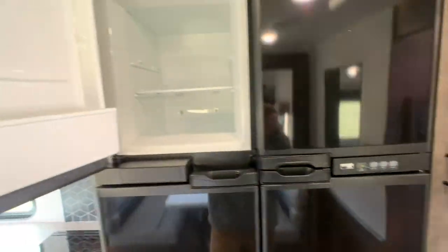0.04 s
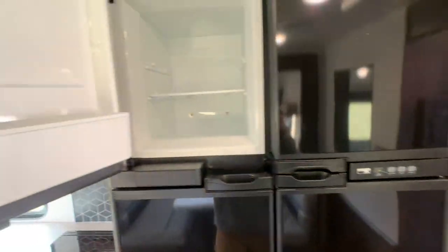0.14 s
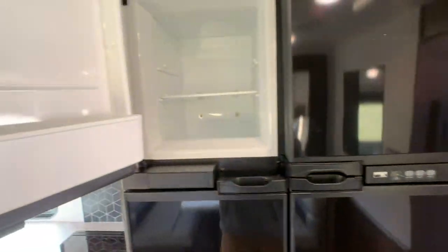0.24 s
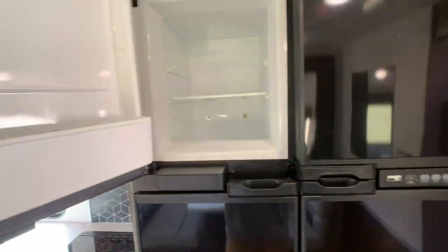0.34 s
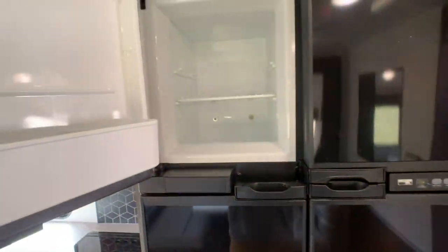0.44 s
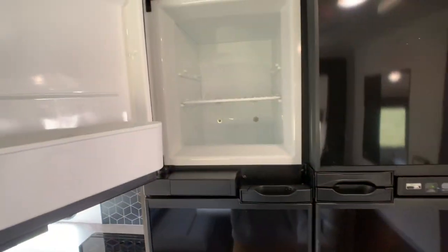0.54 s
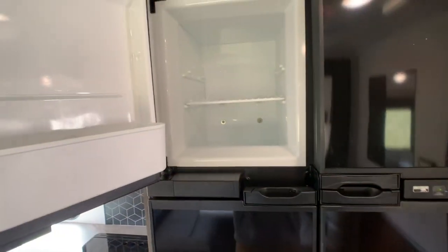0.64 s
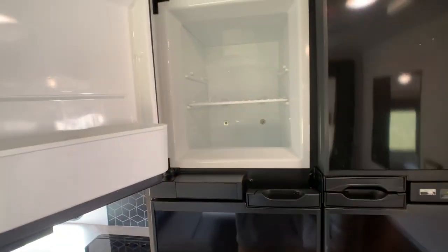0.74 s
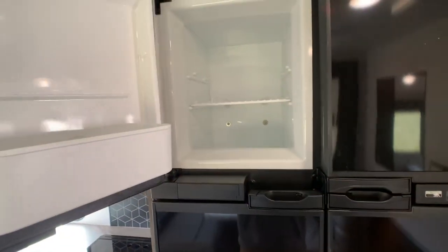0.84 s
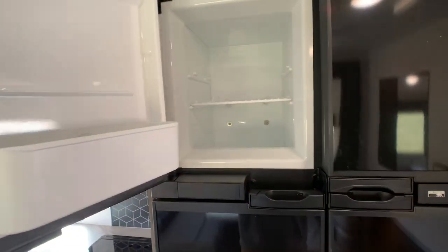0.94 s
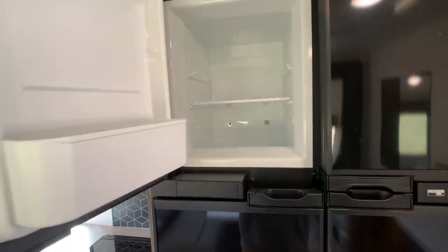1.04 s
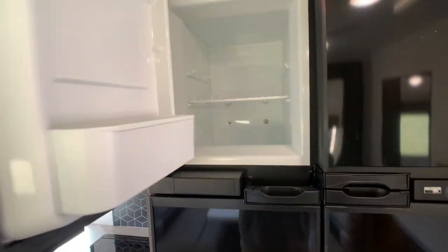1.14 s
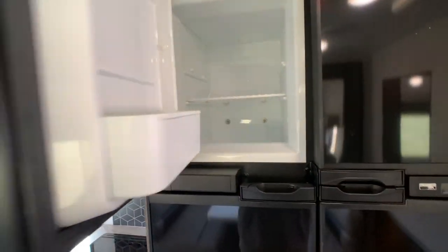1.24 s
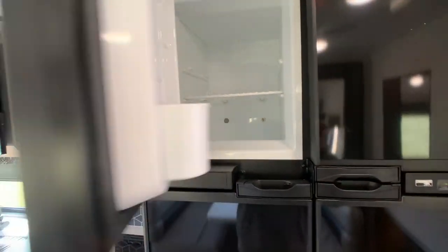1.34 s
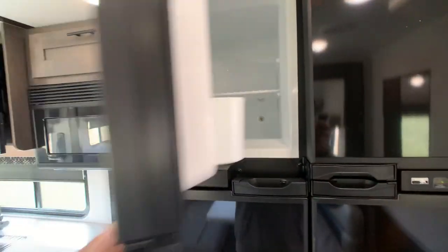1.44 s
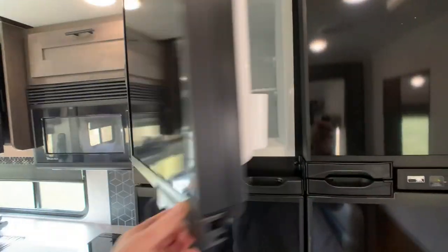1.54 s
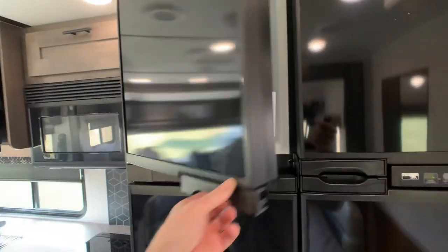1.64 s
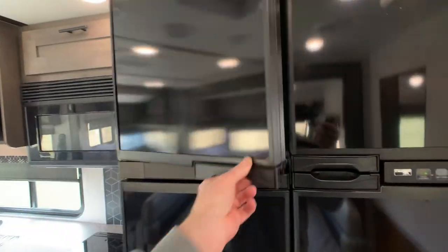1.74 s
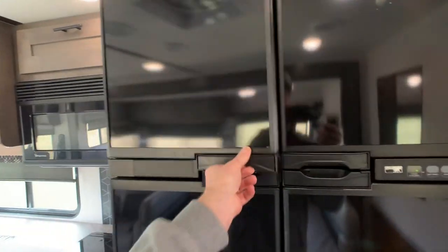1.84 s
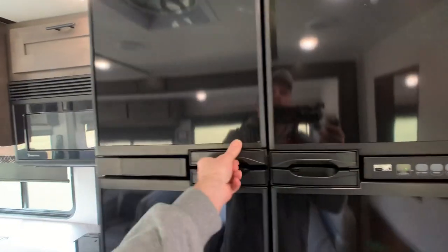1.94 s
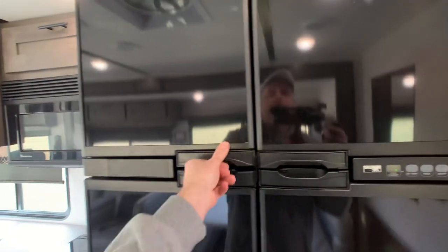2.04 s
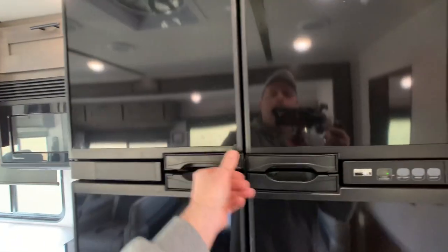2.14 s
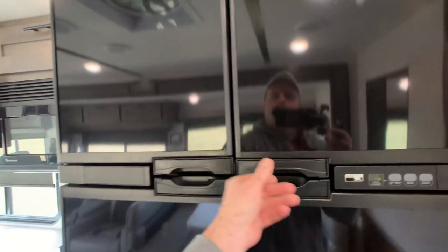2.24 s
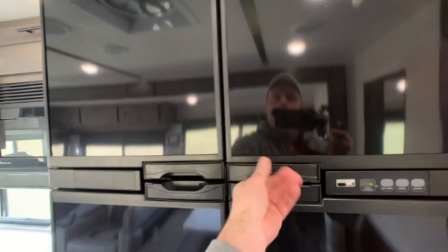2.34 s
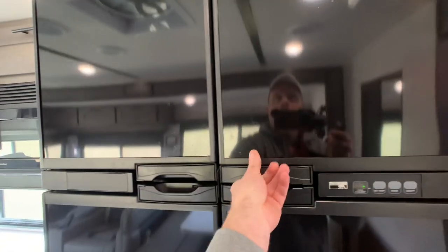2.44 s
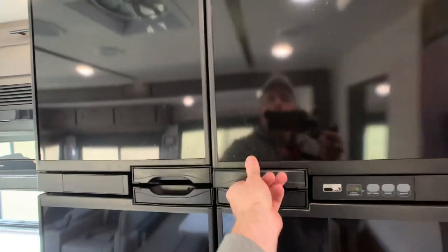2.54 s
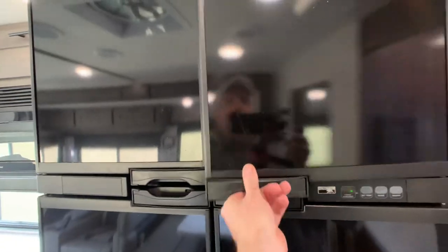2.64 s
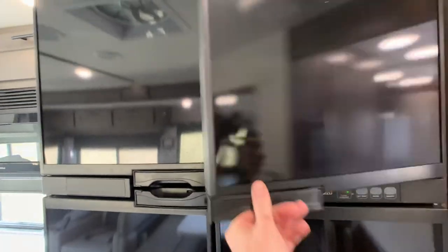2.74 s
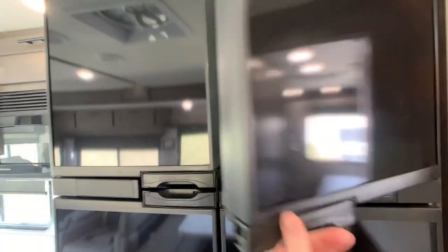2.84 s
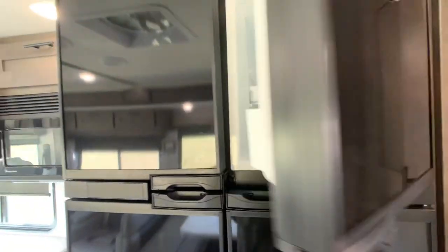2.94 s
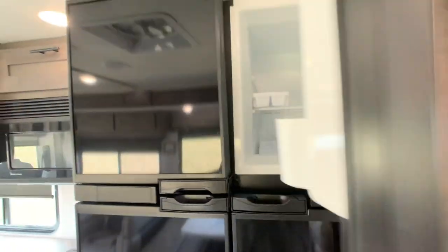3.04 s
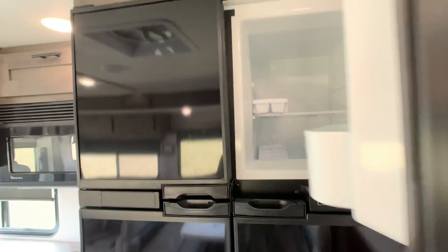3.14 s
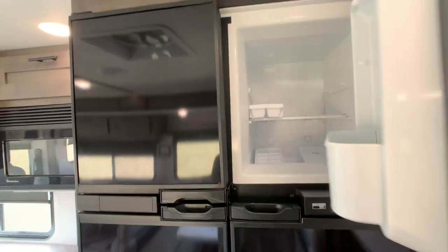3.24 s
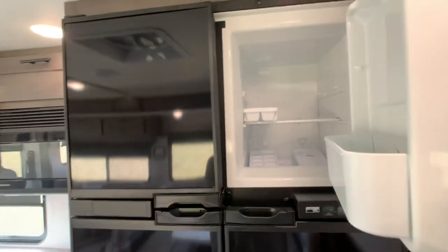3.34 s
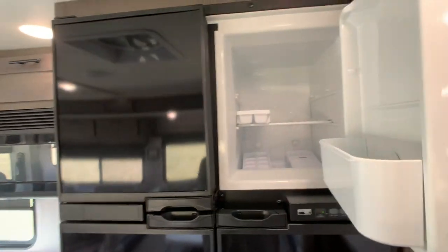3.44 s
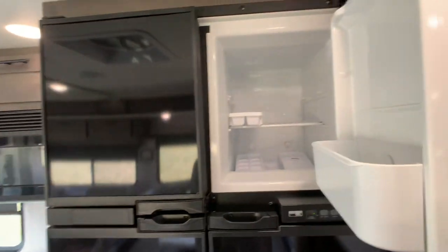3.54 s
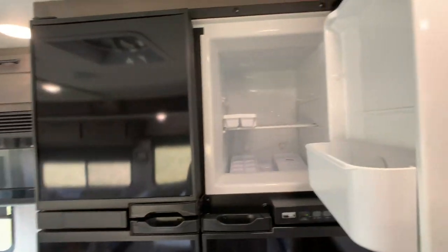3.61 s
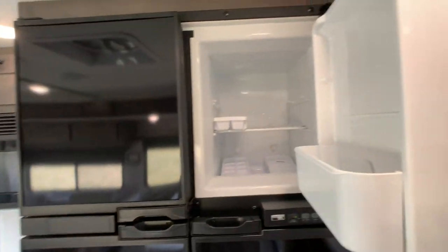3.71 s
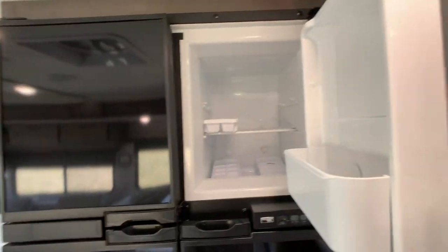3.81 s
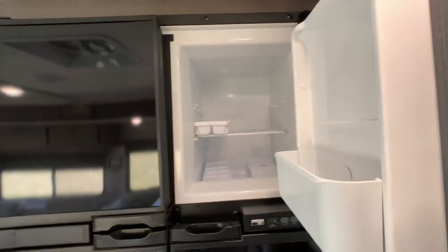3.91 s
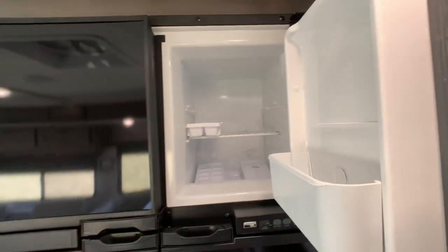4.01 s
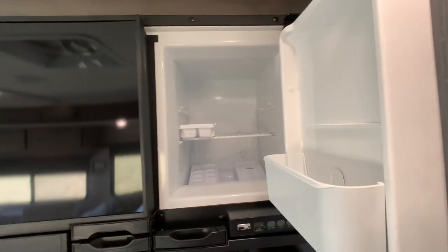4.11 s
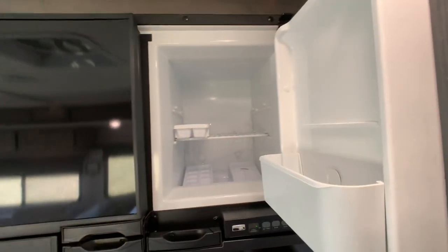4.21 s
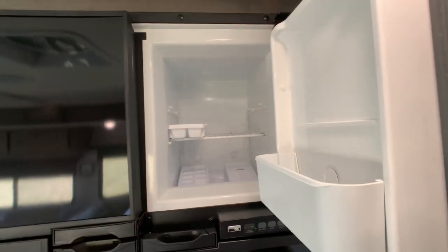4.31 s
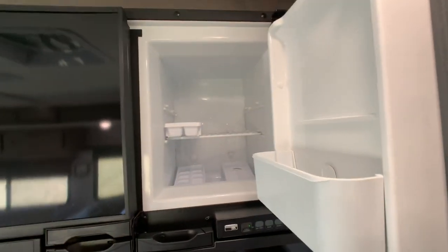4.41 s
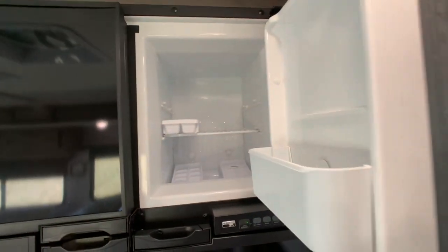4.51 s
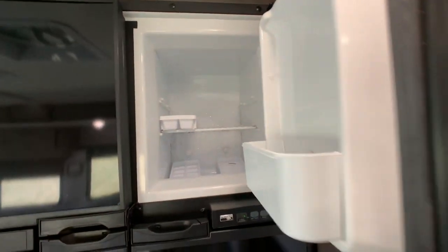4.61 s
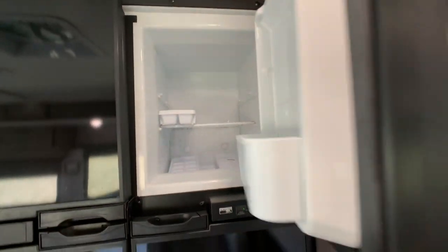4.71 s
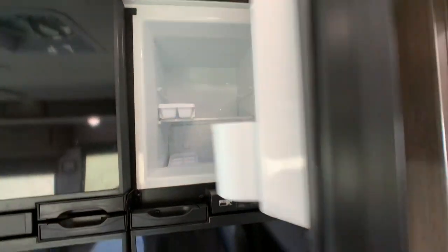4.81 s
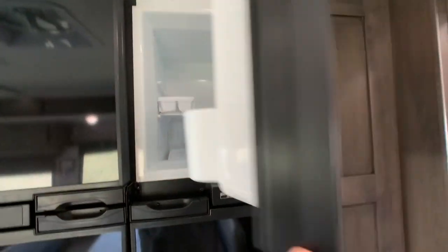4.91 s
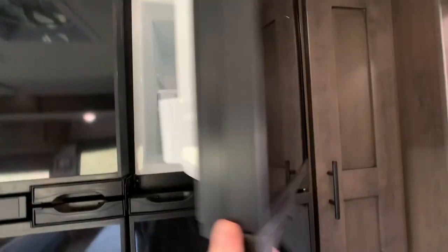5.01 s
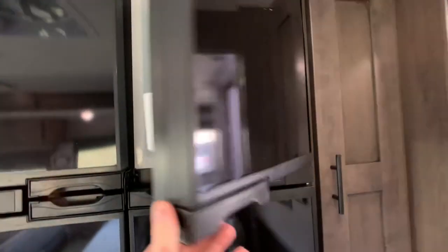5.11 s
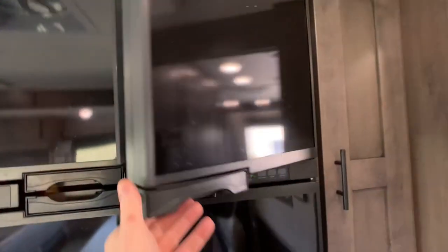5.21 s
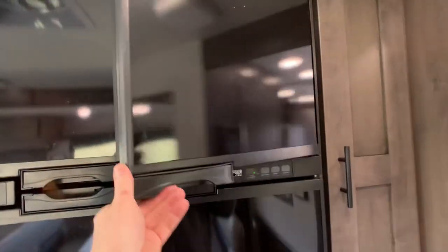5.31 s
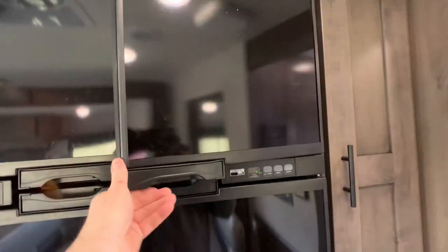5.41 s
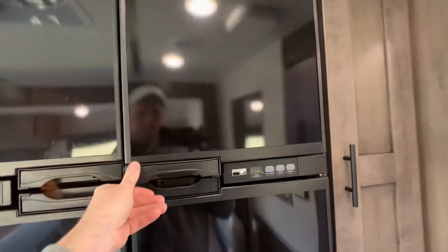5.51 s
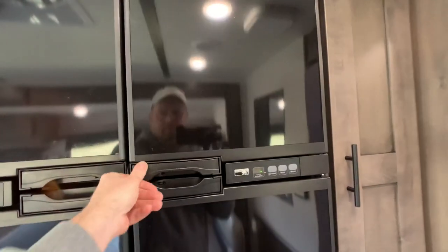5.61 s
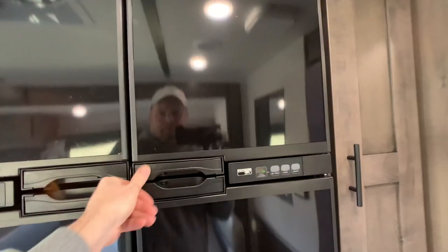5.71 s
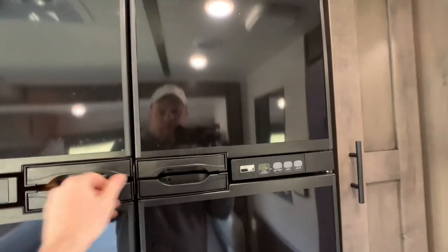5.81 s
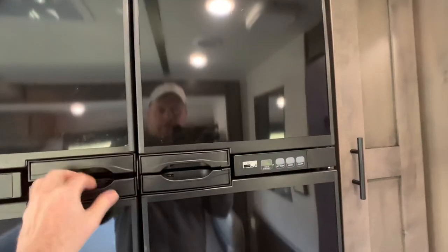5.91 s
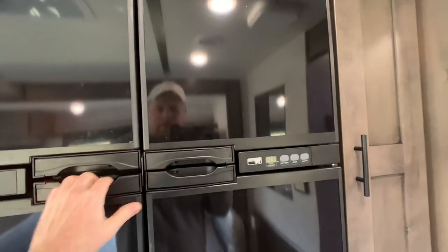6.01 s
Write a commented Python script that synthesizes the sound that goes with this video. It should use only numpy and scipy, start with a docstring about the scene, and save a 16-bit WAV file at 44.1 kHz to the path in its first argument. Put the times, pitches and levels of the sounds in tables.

```python
"""Two plastic-lined freezer doors knock shut in a small cabin, heard from close by.
The left one swings shut; the right one is unlatched, peels off its gasket, opens and is shut again.
Each hit is a short rattle that makes a part ring. Latches scrape over their catches and snap in,
liners and shelves tick, and a hand bumps and rubs. A faint hum and slow air rumble lie underneath."""
import sys
import numpy as np
from scipy import signal
from scipy.fft import rfft, irfft, next_fast_len
from scipy.io import wavfile
from scipy.ndimage import uniform_filter1d

SR = 44100
rng = np.random.default_rng(int(sys.argv[2]) if len(sys.argv) > 2 else 0)


def persist_wave(psi):
    """Save psi, clipped to +-1, as 16-bit WAV."""
    counts = np.round(np.clip(psi, -1, 1) * 32767).astype(np.int16)
    wavfile.write(sys.argv[1], SR, np.atleast_2d(counts).T)


N = 267246
TIME = np.arange(N) / SR
AGE = np.arange(SR // 2) / SR  # seconds since a hit


def amp(db):
    """Turn decibels into a gain."""
    return 10 ** (np.asarray(db) / 20)


def unit(x):
    """Scale a sound to an average (rms) level of 1."""
    return x / np.sqrt(np.mean(x ** 2) + 1e-20)


def fade(t, fade_s):
    """Die away by 60 dB in fade_s seconds: every fade time here means this."""
    return np.exp(-np.log(1000) * t / np.maximum(fade_s, 1e-3))


def swell(peak_s, build_s, fade_s):
    """A gain that grows by 60 dB in build_s, reaches 1 at peak_s and fades again."""
    return fade(np.maximum(peak_s - TIME, 0), build_s) * fade(np.maximum(TIME - peak_s, 0), fade_s)


def along(points, hz):
    """Read between (pitch, value) points, with octaves evenly spaced."""
    pitches, values = np.transpose(points)
    return np.interp(np.log(hz + 1e-3), np.log(pitches), values)


def tilt(hz, db_per_octave):
    """Harder contact is brighter: a slope across the middle and treble."""
    return amp(db_per_octave * np.log2(np.clip(hz, 550, 8500) / 2300))


def filtered(x, response):
    """Turn each pitch in x up or down by response(hz)."""
    size = next_fast_len(len(x) + SR // 4)
    return irfft(rfft(x, size) * response(np.fft.rfftfreq(size, 1 / SR)), size)[:len(x)]


def coloured(x, colour):
    """Shape x with (pitch, level) points, then scale it to level 1."""
    return unit(filtered(x, lambda hz: amp(along(colour, hz))))


def narrow(centre_hz, spread_hz):
    """Noise around one pitch, at level 1."""
    return unit(filtered(rng.standard_normal(N), lambda hz: 1 / (1 + ((hz - centre_hz) / spread_hz) ** 4)))


def causal(gain):
    """A filter with this gain that never sounds before it is struck (minimum phase)."""
    cepstrum = irfft(np.log(np.maximum(gain, 1e-6 * gain.max())))
    half = len(cepstrum) // 2
    return np.exp(rfft(np.r_[cepstrum[0], 2 * cepstrum[1:half], np.zeros(half)]))


def add(track, time_s, sound):
    """Mix a sound into the track at time_s."""
    start = max(round(time_s * SR), 0)
    track[start:start + len(sound)] += sound[:max(N - start, 0)]


# How long the cabin echoes (pitch [Hz], fade time [s])
ECHO_FADES = [(100, 0.24), (500, 0.27), (2000, 0.28), (6000, 0.4), (10000, 0.31), (15000, 0.18)]
def cabin_echo(build_s=0.0056):
    """Close walls send back a dense echo that builds in a few milliseconds; its energy is 1."""
    hz, t, noise = signal.stft(rng.standard_normal(len(AGE)), SR, nperseg=256)
    dying = noise * fade(t, along(ECHO_FADES, hz)[:, None])
    echo = signal.istft(dying, SR, nperseg=256)[1][:len(AGE)]
    echo *= 1 - np.exp(-AGE / build_s)
    return echo / np.linalg.norm(echo)


def in_cabin(x, echo_db):
    """A sound plus its echo."""
    return x + amp(echo_db) * signal.fftconvolve(x, cabin_echo())[:len(x)]


# Tone colours of the cabin's air and of its slow pressure swings (pitch [Hz], relative level [dB])
AIR_COLOUR = [(20, 5), (33, 6), (50, -12.5), (85, -2), (130, -18.5), (220, -17), (380, -19), (520, -20.5),
              (750, -29.5), (1200, -33.5), (3000, -42), (7000, -45.5), (10000, -48), (15500, -48.5)]
SWAY_COLOUR = [(1, -6), (4, -6), (7, 0.5), (12, -4.5), (15, -18), (19, -29), (40, -58), (100, -120)]
def background():
    """A wavering hum, soft cabin noise and very slow swings of air pressure."""
    hum = (amp(-67.5) * narrow(84.8, 18) + amp(-73.5) * narrow(378, 24)
           + amp(-72) * narrow(295, 37) + amp(-78.5) * narrow(505, 44))
    air = amp(-56.5) * coloured(rng.standard_normal(N), [(3.4, -24.5)] + AIR_COLOUR)
    sway = amp(-31.5) * coloured(rng.standard_normal(N), SWAY_COLOUR)
    return hum + air + sway


def stick_slip(slips_per_s, depth_db):
    """Surfaces stick and slip unevenly, so the level jumps about quickly."""
    jumps = rng.standard_normal(N // 20)
    return amp(depth_db * np.interp(TIME * slips_per_s, np.arange(len(jumps)), jumps))


# Rubbing strokes (peak time [s], level [dB], brightness [dB per octave], fade time [s])
STROKES = [(0.005, -41.5, -2.5, 0.08), (1.1, -70.5, 1, 0.25), (1.309, -58.5, -1.5, .38),
           (1.85, -69.5, -0.5, 1.3), (2.071, -58, -3, 0.47), (2.438, -63, 0, 0.45), (2.62, -48.5, -3, 0.55),
           (2.768, -47.5, -1, 0.34), (3.2, -70.5, 0.5, 1.44), (3.68, -71, 0.5, .45),
           (4.41, -72.5, 4.5, 0.27), (4.52, -71, 2, 0.35), (4.81, -70, 2.3, 0.31), (4.97, -76, 0, 0.49),
           (5.4, -63.5, 1.5, 0.56), (5.8, -50.5, -4, 0.19), (6.05, -49, -2.2, 0.81)]
# Tone colour of the rustle (pitch [Hz], relative level [dB])
RUSTLE_COLOUR = [(180, -28.5), (300, -7), (366, -3), (603, -4), (1610, -8.5), (2610, -10.5), (4520, -14),
                 (5340, -15.5), (5800, -17), (8790, -21.5), (16000, -39)]
def rubbing():
    """Skin, sleeve and gasket (the door's seal) rustle: each stroke swells and fades, catching as it goes."""
    track = np.zeros(N)
    for peak_s, db, brightness, fade_s in STROKES:
        noise = rng.standard_normal(N)
        rustle = filtered(noise, lambda hz: amp(along(RUSTLE_COLOUR, hz)) * tilt(hz, brightness))
        track += amp(db) * swell(peak_s, build_s=0.83 * fade_s, fade_s=fade_s) * unit(rustle)
    return in_cabin(track * unit(stick_slip(slips_per_s=290, depth_db=6.5)), echo_db=-4)


# Soft bumps of hand and door (time [s], level [dB], pitch [Hz])
SOFT_BUMPS = [(0.003, -38.5, 103.7), (0.014, -33, 269), (1.933, -36.5, 37), (2.517, -31, 482),
              (2.560, -47, 514), (2.615, -35.5, 85.4), (2.624, -39, 376), (2.627, -29.5, 864),
              (2.857, -46, 209), (6.050, -37, 202)]
def bumps():
    """A soft push rings one note of a panel, roughened by the give of the hand."""
    track = np.zeros(N)
    for time_s, db, hz in SOFT_BUMPS:
        give_colour = [(hz / 4, -22), (hz, 0), (hz * 2, -12), (hz * 8, -45)]
        give = coloured(rng.standard_normal(len(AGE)), give_colour)
        panel = np.sin(2 * np.pi * hz * AGE) + 0.91 * give
        fade_s = 0.16 * (100 / hz) ** 0.92  # higher notes die sooner
        rise = 1 - np.exp(-AGE * hz / 0.8)  # builds in about one cycle
        add(track, time_s, amp(db) * panel * fade(AGE, fade_s) * rise)
    return in_cabin(track, echo_db=-5.5)


# The four pitch ranges of a hit: thud, knock, clack and tick (lowest [Hz], highest [Hz])
HIT_RANGES = [(50, 250), (250, 1200), (1200, 4500), (4500, 15900)]
def strike(hits, notes, body, body_db, echo_db, thud_db, knock_db, tick_db, rise_share):
    """Each hit is a short rattle that rings a part's clear notes, its body (many short notes) and the cabin."""
    hz = np.fft.rfftfreq(len(AGE), 1 / SR)
    peaks = sum(amp(db) ** 2 / (1 + (2 * (hz - pitch) / width) ** 2) ** 1.5 for pitch, width, db in notes)
    part = np.sqrt(peaks + amp(along(body, hz) + body_db) ** 2)
    # Balance thud, knock and tick against the clack.
    strengths = np.array([np.linalg.norm(part[(hz > low) & (hz < high)]) for low, high in HIT_RANGES])
    balance_db = np.array([thud_db, knock_db, 0, tick_db]) - 20 * np.log10(strengths)
    middles_hz = np.sqrt(np.prod(HIT_RANGES, axis=1))
    part *= amp(along(np.c_[middles_hz, balance_db], hz))
    scale = np.sqrt(len(AGE) * 0.035 * SR / 2)  # a hit's level is its energy spread over 35 ms
    track = np.zeros(N)
    for time_s, db, brightness, fade_s in hits:
        rise = 1 - np.exp(-AGE / max(rise_share * fade_s, 1e-4))
        rattle = rng.standard_normal(len(AGE)) * fade(AGE, fade_s) * rise
        force = rfft(rattle / np.linalg.norm(rattle) + amp(echo_db) * cabin_echo())
        # A hard hit drives all pitches alike, so even out the force's chance ripples.
        ripples = np.sqrt(np.abs(uniform_filter1d(np.abs(force) ** 2, size=110)))
        gain = amp(db) * part * tilt(hz, brightness) / ripples
        add(track, time_s, scale * irfft(force * causal(gain)))
    return track


# Liner ticks and bin rattles (time [s], level [dB], brightness [dB per octave], fade time [s])
LINER_HITS = [(0.805, -68.5, -0.5, 0.049), (0.873, -74, -4.5, 0.11), (0.900, -68.5, -2.5, 0.072),
              (1.378, -65, 2, .035), (1.410, -49.5, 2, 0.19), (2.991, -71, -4.5, 0.043),
              (3.072, -63.5, 5, 0.059), (3.13, -70, -3.5, 0.027), (3.153, -70, -0.5, .057),
              (3.409, -77, -3, 0.063), (3.717, -70, -1, 0.083), (5.027, -56, .5, 0.075),
              (5.091, -61.5, 0, 0.049), (5.385, -61, -1, 0.12)]
BIN_HITS = [(1.564, -53.5, 1, 0.08), (1.581, -50, .5, .09)]
# The notes they ring at (pitch [Hz], width [Hz], relative level [dB])
LINER_NOTES = [(1426, 390, 2), (1850, 105, 9), (2180, 210, -2.5), (2820, 40, 3.5), (3350, 120, 2),
               (4023, 140, 1)]
BIN_NOTES = [(1560, 160, -1.5), (2680, 210, 3.5), (3050, 160, 1.5), (3540, 130, 0), (5420, 400, -9.5),
             (6250, 140, -5.5)]
# Body tone of both (pitch [Hz], relative level [dB])
PLASTIC_COLOUR = [(100, -19.5), (300, -3.5), (1000, -8), (2000, -3.5), (3500, -8), (6500, -12), (8000, -16),
                  (10000, -25), (16000, -41)]
def liners():
    """Door liners and shelves tick as the doors swing, and the left door's bin rattles in its seat."""
    ticks = strike(LINER_HITS, LINER_NOTES, PLASTIC_COLOUR, body_db=3, echo_db=-1.5,
                   thud_db=-17, knock_db=3, tick_db=-11.5, rise_share=0.016)
    rattle = strike(BIN_HITS, BIN_NOTES, PLASTIC_COLOUR, body_db=-5, echo_db=-4.5,
                    thud_db=-23, knock_db=-2, tick_db=-7.5, rise_share=0.045)
    return ticks + rattle


# Pushes of a bolt over its catch (time it slips [s], level [dB])
BOLT_PUSHES = [(2.447, -49), (2.593, -41), (2.629, -44.5), (5.516, -41.5), (5.553, -27)]
# The notes the bolt rings at (pitch [Hz], spread to each side [Hz], relative level [dB])
BOLT_NOTES = [(1727, 29, -4.5), (1833, 99, -7.5), (2080, 93, -9), (1350, 300, -5.5), (2630, 54, -27.5),
              (4300, 830, -18.5)]
def bolt_scrape():
    """The bolt judders along its catch and rasps at its own notes, louder and louder until it slips."""
    rasp = sum(amp(db) * narrow(hz, spread) for hz, spread, db in BOLT_NOTES)
    push = sum(amp(db) * swell(slip_s, build_s=0.08, fade_s=0.059) for slip_s, db in BOLT_PUSHES)
    judder = stick_slip(slips_per_s=260, depth_db=2)
    return in_cabin(push * unit(rasp * judder), echo_db=-8)


# Latch, spring and handle clicks (time [s], level [dB], brightness [dB per octave], fade time [s])
LATCH_HITS = [(1.89, -35, -0.5, 0.12), (1.904, -43, 5, 0.12), (2.398, -61, -1.5, 0.04),
              (2.417, -64, -2.5, .089), (2.436, -58.5, -3, .07), (2.476, -50, -.5, 0.097),
              (2.729, -48, 2.5, 0.096), (2.741, -56.5, 1, .025), (5.496, -54.5, -2, 0.048),
              (5.508, -45, -3, 0.084), (5.529, -52.5, -4, 0.1), (5.54, -38, 2, 0.077),
              (5.546, -51, 11.5, .051)]
SPRING_HITS = [(2.605, -42.5, 0, 0.051)]
HANDLE_HITS = [(0.637, -81, 9.5, 0.017), (5.894, -57.5, 3, 0.03), (5.917, -53, -1.5, 0.047),
               (5.938, -50, -1.5, 0.085), (5.964, -48.5, 0, .024), (5.995, -46.5, 2.5, 0.044)]
# The notes each part rings at (pitch [Hz], width [Hz], relative level [dB])
LATCH_NOTES = [(284, 74, -0.5), (538, 110, -3.5), (1580, 140, -5.5), (1970, 36, -8.5), (2457, 130, -17.5),
               (3600, 250, -14.5), (5230, 240, -18), (5490, 33, -18), (6000, 220, -18.5), (7440, 17, -16.5)]
SPRING_NOTES = [(1520, 70, 1.5), (1810, 140, 1), (4570, 330, -10), (7310, 200, 5.5), (8250, 440, -2),
                (9800, 400, -15), (12000, 770, -11), (12700, 560, -14.5)]
HANDLE_NOTES = [(1860, 170, -4), (2710, 200, -4), (3240, 160, 1.5), (4140, 250, -7), (5410, 310, 0.5),
                (8550, 400, -2.5)]
# Body tone of each part (pitch [Hz], relative level [dB])
LATCH_COLOUR = [(47, -38), (80, 3), (156, -22), (303, -11), (563, -15), (877, -15.5), (1090, -15),
                (1530, -18.5), (1740, -12), (2330, -18), (3870, -23), (4730, -26), (5900, -26.5),
                (12800, -44), (16000, -47.5)]
SPRING_COLOUR = [(100, -35), (300, 3), (900, -12), (2000, -12), (3000, -11.5), (6200, -11.5), (8000, -10),
                 (10500, -8), (13000, -17), (14200, -34), (16000, -31)]
HANDLE_COLOUR = [(100, -10), (400, 17), (1000, -6), (3000, -16.5), (6000, -17), (9000, -22), (16000, -36)]
def latches():
    """Plastic bolts chatter on their catches, a spring snaps as the right one lets go, fingers tap the handle."""
    chatter = strike(LATCH_HITS, LATCH_NOTES, LATCH_COLOUR, body_db=8.5, echo_db=-5,
                     thud_db=-5.5, knock_db=4, tick_db=-7, rise_share=0.03)
    spring = strike(SPRING_HITS, SPRING_NOTES, SPRING_COLOUR, body_db=-2, echo_db=-4,
                    thud_db=-43, knock_db=4, tick_db=-2, rise_share=0.012)
    fingers = strike(HANDLE_HITS, HANDLE_NOTES, HANDLE_COLOUR, body_db=8, echo_db=-6,
                     thud_db=-17, knock_db=-7, tick_db=-15, rise_share=0.03)
    return chatter + spring + fingers


# Each door shutting (time [s], level [dB], brightness [dB per octave], fade time [s])
LEFT_HITS = [(1.9325, -28, -1, 0.038), (1.938, -29, 1.5, .065)]
RIGHT_HITS = [(5.600, -29, 2.7, 0.046), (5.6025, -32, 3.5, 0.01), (5.605, -30, -0.4, 0.048),
              (5.643, -35.5, -0.5, 0.022)]
# The notes each door rings at (pitch [Hz], width [Hz], relative level [dB])
LEFT_NOTES = [(83, 35, -6), (168, 50, 0.5), (337, 42, 2.5), (365, 49, -3), (513, 32, -1), (558, 69, 0.5),
              (602, 39, -0.5), (715.5, 73, -6), (882, 45, 1), (928, 45, -1), (1089, 45, -11),
              (1210, 38, -7), (1425.5, 74, -11), (1720, 66, -9.5), (1847, 48, -10.5), (2121, 210, -12.5),
              (2726, 85, -15.5), (5730, 150, -17.5)]
RIGHT_NOTES = [(84, 40, 6.5), (167, 22, 0.5), (311, 30, 2.5), (520, 82, 1), (580, 49, 3), (820, 70, 0),
               (870, 89, -13), (1230, 80, -22), (1690, 130, 0.5), (1820, 150, -8), (2236, 78, -1),
               (2970, 330, -3), (3870, 350, -4.5), (5370, 140, -7), (6230, 560, -8.5), (7340, 280, -7),
               (8240, 350, -8.5)]
# Body tone of each door (pitch [Hz], relative level [dB])
LEFT_COLOUR = [(30, -23.5), (70, -7.5), (130, -13.5), (230, -11), (320, -6.5), (600, -3.5), (1000, -5.5),
               (2000, -12.5), (3500, -18.5), (7000, -24.5), (9000, -28), (11000, -37), (16000, -46)]
RIGHT_COLOUR = [(30, -38), (70, -7), (130, -8), (220, -14), (330, -4.5), (900, -2), (1400, -3),
                (2000, -1.5), (2500, -14), (4000, -8), (8300, -13), (10000, -19), (16000, -25.5)]
def doors():
    """The doors hit the cabinet: the left with a dull knock, the right with a hard snap and a bounce."""
    left = strike(LEFT_HITS, LEFT_NOTES, LEFT_COLOUR, body_db=-2.5, echo_db=-8,
                  thud_db=-2, knock_db=6, tick_db=-6, rise_share=0.04)
    right = strike(RIGHT_HITS, RIGHT_NOTES, RIGHT_COLOUR, body_db=1, echo_db=-9,
                   thud_db=0, knock_db=4, tick_db=-3.5, rise_share=0.073)
    return left + right


def scene():
    """All the sounds together in one channel."""
    return (doors() + latches() + bolt_scrape() + liners() + bumps() + rubbing() + background())[None]


def record(dry):
    """Cut off the very highest treble, above 15850 Hz."""
    return np.array([filtered(x, lambda hz: 1 / (1 + (hz / 15850) ** 200)) for x in dry])


dry = scene()
out = record(dry)
persist_wave(out)
```